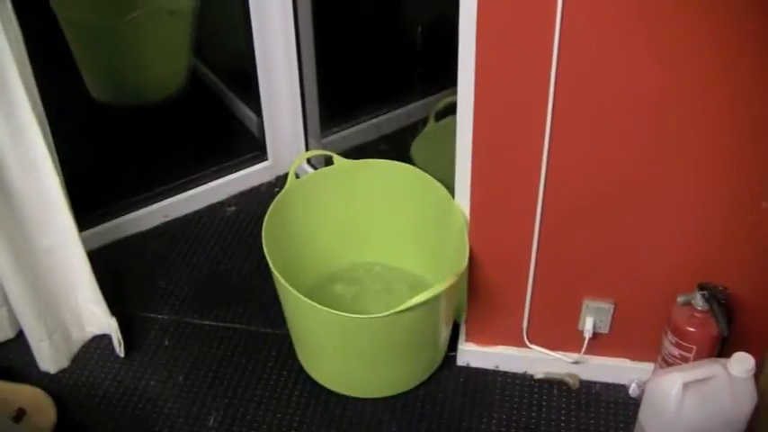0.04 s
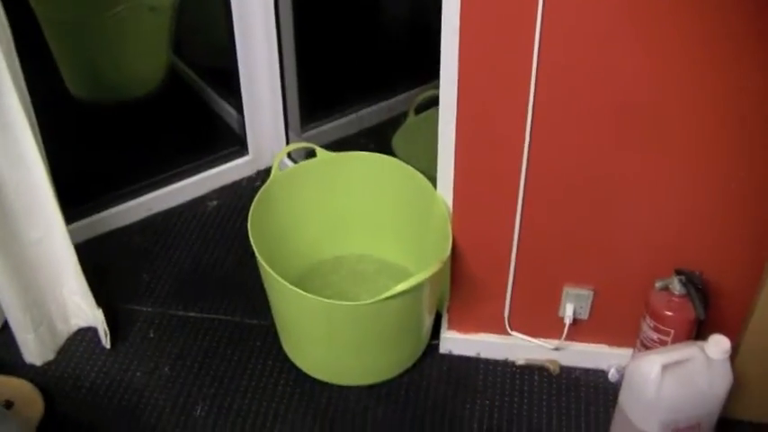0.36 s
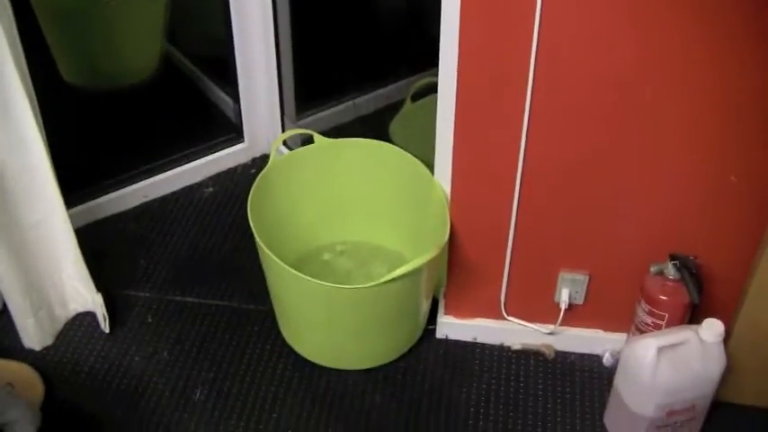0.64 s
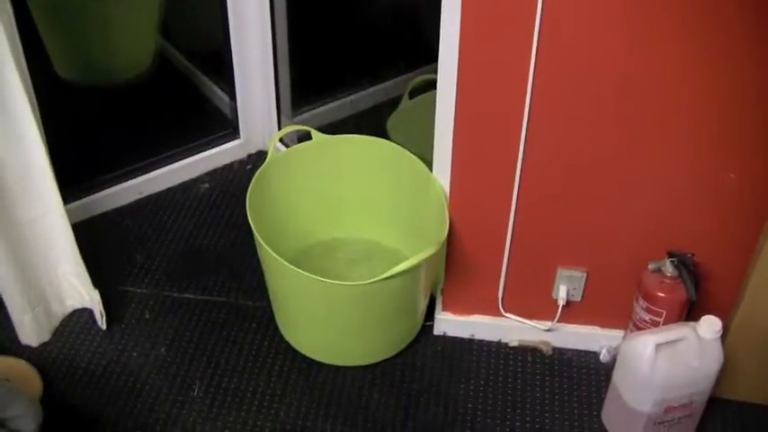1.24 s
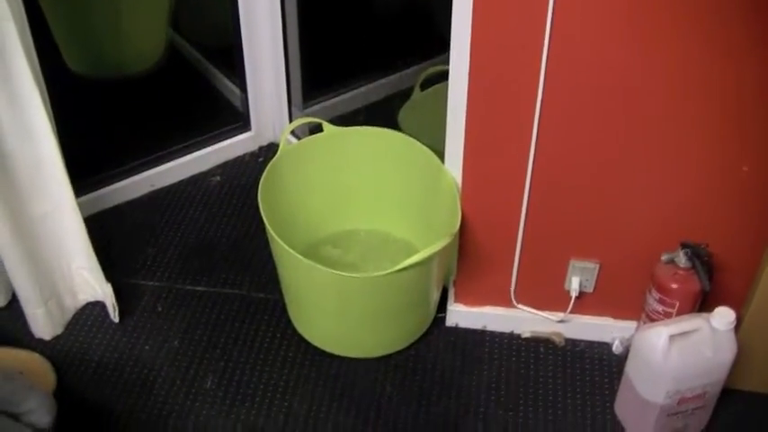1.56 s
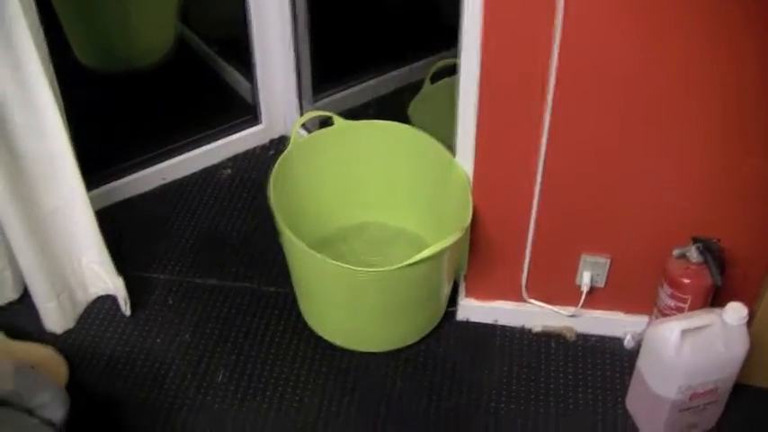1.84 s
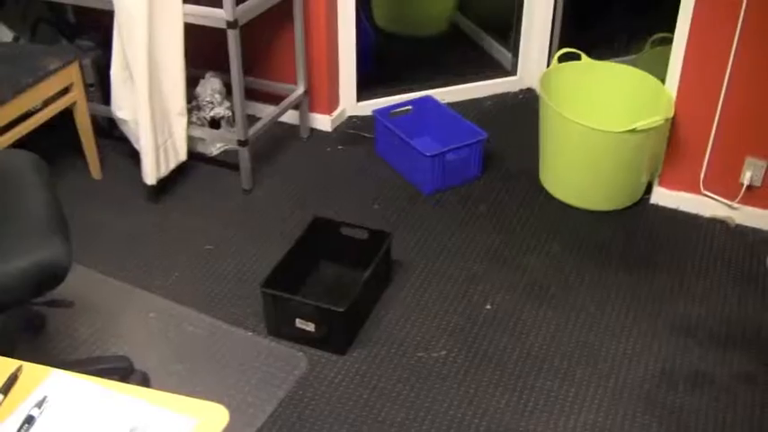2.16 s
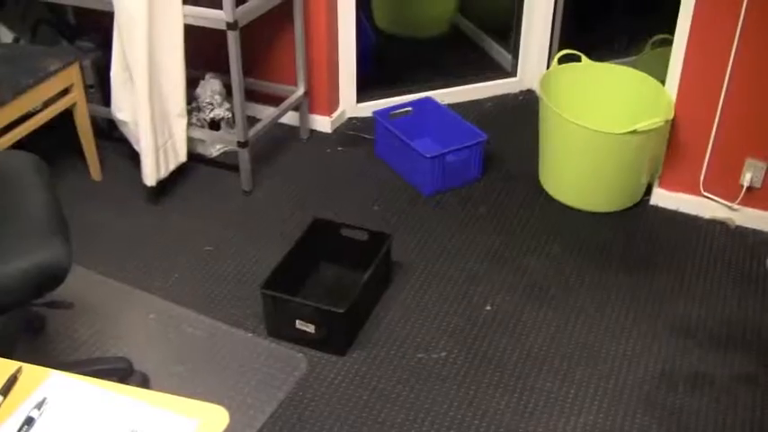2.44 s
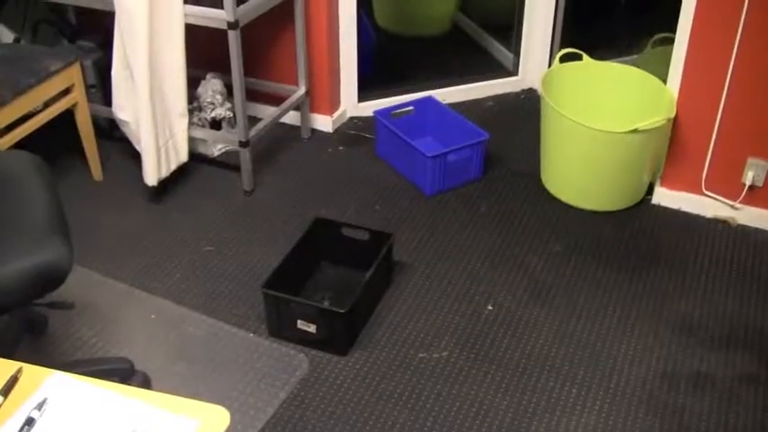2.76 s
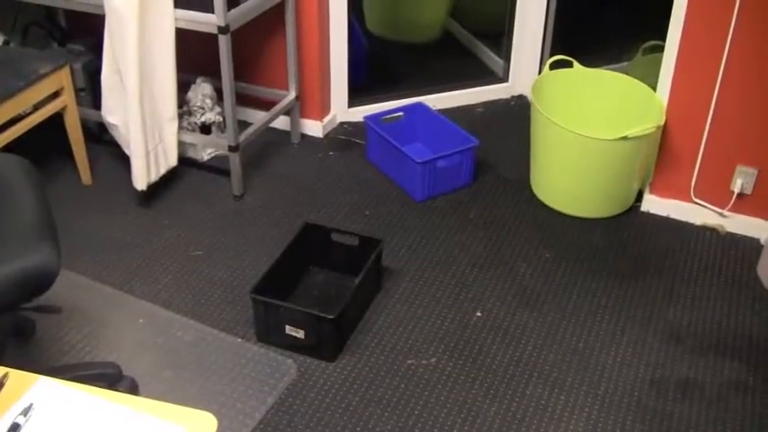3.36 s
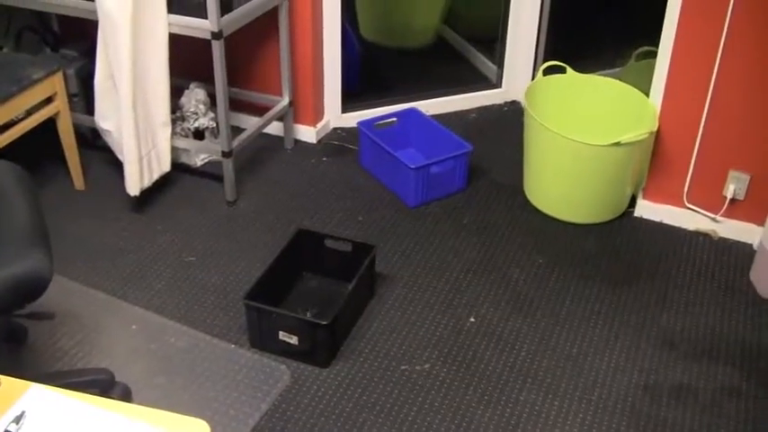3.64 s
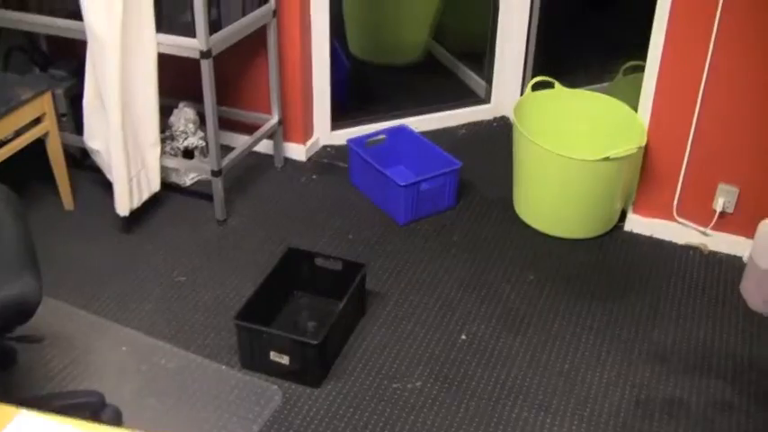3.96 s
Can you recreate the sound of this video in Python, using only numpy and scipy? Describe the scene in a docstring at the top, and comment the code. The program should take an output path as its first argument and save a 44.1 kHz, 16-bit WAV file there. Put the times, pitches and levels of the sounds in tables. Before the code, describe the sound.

A stream of water spatters into a plastic tub, giving way to irregular knocking drips.

```python
"""Ceiling leak into a plastic tub

Water pours from a leaking ceiling into a plastic tub: it spatters, traps bubbles and drums on the floor of the
tub. After two seconds the scene changes: the pour fades out and a scene of single drops fades in, knocking
unevenly on the tub and two plastic crates and throwing spray. All is heard from a few metres away in a small,
quiet room."""
import sys
import numpy as np
from scipy import signal
from scipy.fft import rfft, irfft
from scipy.io import wavfile
from scipy.ndimage import uniform_filter1d

SR = 44100
rng = np.random.default_rng(int(sys.argv[2]) if len(sys.argv) > 2 else 0)


def unload_audio(sound):
    """Save the sound as a 16-bit wav file, at the path given as the first command line argument."""
    columns = np.transpose(np.atleast_2d(sound))
    # keep every value between -1 and 1, then stretch to whole-number steps
    steps = np.round(np.clip(columns, -1, 1) * 32767)
    wavfile.write(sys.argv[1], SR, steps.astype(np.int16))


N = 176400
POUR_FADE_S, POUR_END_S, DRIPS_START_S, DRIPS_FULL_S = 1.985, 2.085, 2.033, 2.18


def undb(db):
    """Decibels to gain."""
    return 10 ** (np.asarray(db) / 20)


def unit(x):
    """Scale to rms 1."""
    return x / np.sqrt(np.mean(x ** 2) + 1e-20)


def clock(size=N):
    """Seconds, sample by sample."""
    return np.arange(size) / SR


def decay(t, t60):
    """A fall of 60 dB in t60 seconds."""
    return np.exp(-np.log(1000) * t / max(t60, 1e-3))


def attack(t, seconds):
    """A soft onset with the given time constant."""
    return 1 - np.exp(-t / seconds)


def add(out, start, sound):
    """Mix a sound in at its start time."""
    i = max(int(start * SR), 0)
    out[i:i + len(sound)] += sound[:max(len(out) - i, 0)]


def colour(x, points, size=2048):
    """Minimum-phase EQ that follows (Hz, dB) points."""
    hz, db = np.array(points, float).T
    gain = undb(np.interp(np.log(np.fft.rfftfreq(size, 1 / SR) + 1), np.log(hz), db))
    cepstrum = irfft(np.log(gain))
    cepstrum[1:size // 2] *= 2
    cepstrum[size // 2 + 1:] = 0
    return signal.fftconvolve(x, irfft(np.exp(rfft(cepstrum))))[:len(x)]


def burst(points, t60, size=8192):
    """Coloured noise that starts at rms 1 and dies away."""
    noise = rng.standard_normal(size)
    return colour(noise * decay(clock(size), t60), points) / np.std(colour(noise, points))


def glide(t, hz, rise):
    """A sine that passes through hz at t = 0, gliding by `rise` octaves per second."""
    pitch = np.minimum(hz * 2 ** (rise * t), SR / 2)
    return np.sin(2 * np.pi * np.cumsum(pitch) / SR)


def waver(depth_db, smooth_samples, size=N):
    """A gain that wanders at random, by depth_db rms."""
    drift = uniform_filter1d(rng.standard_normal(size), 1500)
    return undb(depth_db * unit(uniform_filter1d(drift, smooth_samples)))


def impacts(per_s, spread_db, size=N):
    """Random tiny hits, many weak and a few strong."""
    strength = undb(spread_db * np.minimum(rng.exponential(size=size), 4.3))
    return unit((rng.random(size) < per_s / SR) * strength * rng.choice([-1, 1], size))


def patter(per_s, spread_db, size=N):
    """Droplets in six sizes, per_s of each, ticking in their own octave and arriving in flurries."""
    out = np.zeros(size)
    for octave in range(6):
        band = signal.butter(1, [300 * 2 ** octave, 600 * 2 ** octave], "bandpass", fs=SR, output="sos")
        flurries = waver(depth_db=2, smooth_samples=800, size=size)
        out += signal.sosfilt(band, impacts(per_s, spread_db, size)) * flurries
    return out


def bubble(hz, t60, rise, attack_cycles=2.34, size=4096):
    """A trapped bubble rings and rises in pitch as it nears the surface."""
    t = clock(size)
    return glide(t, hz, rise) * decay(t, t60) * attack(t, attack_cycles / hz)


def fizz(level_db, low_hz, high_hz, cycles, spread_db, count=650):
    """A swarm of small bubbles, many weak and a few strong, each ringing for roughly `cycles` periods."""
    out = np.zeros(N)
    for when, pitch, chance, life in rng.random((count, 4)):
        hz = low_hz * (high_hz / low_hz) ** pitch
        strength = undb(-spread_db * np.log(max(chance, .02)))
        add(out, when * POUR_END_S, strength * bubble(hz, t60=(.5 + life) * cycles / hz, rise=8.5))
    return undb(level_db) * out / np.std(out[:int(POUR_END_S * SR)])


def swell(hz, peak_s, width_s, rise, size=4096):
    """A gliding note that swells to its peak and dies away."""
    t = clock(size) - peak_s
    return glide(t, hz, rise) * np.exp(-(t / max(width_s, 1e-3)) ** 2)


def splash(hz, t60):
    """A short splat of torn water, brightest around one frequency."""
    skirt = 2 ** 0.67  # two thirds of an octave
    spectrum = [(hz / 30, -50), (hz / 10, -30), (hz / skirt, -9), (hz, 0), (hz * skirt, -9),
                (hz * 10, -40)]
    return burst(spectrum, t60)


def pour():
    """The stream spatters on the water, drums on the tub floor and drags bubbles under."""
    # EQ of the bright spatter and the low drumming. Each row: frequency in Hz, gain in dB.
    spatter_eq = [(400, 0.5), (1000, 5.5), (2000, 5), (3500, 4.5), (5000, 4.5), (7500, 3), (10000, 0),
                  (13000, -4.5), (16000, -11)]
    drumming_eq = [(30, -58), (60, -14.5), (100, -10.5), (160, 2.5), (205, 2), (320, 6.5), (450, 1),
                   (600, 0.5), (1000, -9.5), (2500, -23)]
    # Bubbles that stand out. Each row: peak time in seconds, pitch in Hz, level in dB,
    # half width in seconds, glide in octaves per second.
    big_bubbles = [(0.029, 2650, -25, 0.004, -2), (0.216, 1816, -28.5, 0.0045, 9),
                   (0.254, 1230, -30.5, 0.0097, 0), (0.256, 1986, -34.5, 0.017, 7.5),
                   (0.32, 836, -35, 0.009, 12), (0.34, 1185, -38, 0.012, 7), (0.513, 1020, -41.5, 0.018, 1),
                   (0.556, 1110, -34, 0.0051, 12), (0.562, 1460, -38, 0.0097, -2),
                   (0.654, 965, -32, 0.0067, 0), (0.662, 564, -30, 0.004, 15),
                   (0.728, 832.6, -31, 0.0092, 6), (0.757, 2100, -32, 0.006, 6.5),
                   (0.821, 1390, -40.5, 0.013, 2), (0.939, 2552, -35, 0.012, 9.5),
                   (1.011, 1032, -41, 0.0096, 4.5), (1.056, 1185, -41.5, 0.019, 1.5),
                   (1.166, 1139, -40.5, 0.01, 9.5), (1.224, 1148, -45, 0.012, 3),
                   (1.238, 3960, -34, 0.011, 9.5), (1.275, 1240, -35, 0.0053, 3),
                   (1.354, 800, -36, 0.0049, 2), (1.37, 1160, -36, 0.013, 6),
                   (1.418, 3618, -27.5, 0.004, 14), (1.427, 1211, -24.5, 0.0092, -0.5),
                   (1.507, 1110, -36, 0.0093, 12.5), (1.536, 1970, -33, 0.0036, 13),
                   (1.58, 935, -41, 0.015, 2), (1.638, 2280, -34.5, 0.0037, 0),
                   (1.708, 1072, -35, 0.004, -2), (1.772, 457.4, -31.5, 0.021, 6),
                   (1.786, 1128, -23, 0.0035, 12), (1.87, 2060, -29.5, 0.0034, 13),
                   (1.892, 1094, -33.5, 0.006, -2.5), (1.953, 1235, -29.5, 0.006, 15),
                   (1.98, 746, -26, 0.009, 5.5), (1.975, 1143, -30, 0.006, 5),
                   (1.994, 2100, -26.5, 0.004, 2), (2.002, 1085, -28, 0.00408, -5),
                   (2.01, 1260, -24.5, 0.004, 14)]
    # Splash accents. Each row: start in seconds, level in dB, brightest frequency in Hz, t60 in seconds.
    big_splashes = [(0.024, -22, 3030, 0.15), (.197, -28, 334, .06), (.204, -29, 7400, 0.054),
                    (.44, -30.5, 238, 0.076), (0.869, -35, 9140, 0.024), (1.3894, -41, 6560, .02),
                    (1.956, -30, 7800, 0.029), (0.051, -25, 5440, 0.071), (.154, -27.5, 5500, 0.034),
                    (.258, -27.5, 1930, 0.042), (0.375, -25, 4570, 0.031), (0.4974, -21.5, 5940, 0.023),
                    (0.502, -29, 6000, 0.15), (.657, -26, 3600, 0.03), (.66, -31, 400, 0.16),
                    (0.8953, -32, 8000, 0.031), (0.927, -28.5, 2670, 0.074), (1.229, -29, 4240, 0.1),
                    (1.105, -29.5, 3600, 0.086), (1.415, -22, 2950, 0.055), (1.447, -25.5, 6080, 0.015),
                    (1.62, -30.5, 3570, 0.04), (1.782, -26, 676, 0.11), (1.784, -28, 3240, 0.11),
                    (1.831, -27.5, 7780, 0.062), (1.872, -24, 3570, 0.18), (1.902, -31, 312, 0.13)]
    flow = waver(depth_db=1.54, smooth_samples=1000)
    spatter = undb(-37.5) * unit(colour(patter(per_s=1700, spread_db=2.5), spatter_eq))
    drumming = undb(-41.5) * unit(colour(impacts(per_s=260, spread_db=1.5), drumming_eq))
    gurgle = fizz(level_db=-41, low_hz=886.5, high_hz=5940, cycles=24, spread_db=3.5)
    ticks = fizz(level_db=-46, low_hz=5000, high_hz=14000, cycles=28, spread_db=4.5)
    out = flow * spatter + gurgle + ticks + drumming
    for peak, hz, db, width, rise in big_bubbles:
        add(out, peak - 2 * width, undb(db + 3.5) * swell(hz, 2 * width, width, rise))
        add(out, peak - width, undb(db - 9) * splash(hz, t60=0.084))  # the splash that traps the bubble
    for start, db, hz, t60 in big_splashes:
        add(out, start, undb(db + 1) * splash(hz, t60))
    return out


def reverb_tail(t):
    """The room's diffuse ring; the treble hangs on a little longer."""
    noise = rng.standard_normal(len(t))
    low = signal.sosfilt(signal.butter(1, 2500, fs=SR, output="sos"), noise)
    ring = (low * decay(t, t60=0.38) + (noise - low) * decay(t, t60=0.51)) * attack(t, 0.0059)
    return ring / np.linalg.norm(ring)


def room(x, tail_db, side_db, size=32768):
    """Direct sound, dull first reflections and a diffuse tail; the treble is wide, the bass central."""
    # First reflections. Each row: delay in seconds, level in dB.
    reflections = [(.0052, -26), (.0087, -17), (0.0127, -13.5), (0.0191, -14), (0.048, -23), (0.052, -14)]
    # EQ of the left-right difference. Each row: frequency in Hz, gain in dB.
    side_eq = [(60, -15), (300, -11.5), (1200, -13.5), (2500, -11), (4500, -6.5), (8000, -2.5),
               (11000, 2.5), (16000, 5)]
    t, early = clock(size), np.zeros(size)
    for lag, db in reflections:
        add(early, lag, undb([db]))
    mid = signal.sosfilt(signal.butter(1, 3080, fs=SR, output="sos"), early)
    mid += undb(tail_db) * reverb_tail(t)
    mid[0] += 1  # direct sound
    nearby = rng.standard_normal(size) * decay(t, t60=0.0064)
    side = undb(side_db) * colour(nearby / np.linalg.norm(nearby) + 0.63 * reverb_tail(t), side_eq)
    mid, side = (signal.fftconvolve(x, response)[:N] for response in (mid, side))
    return np.array([mid + side, mid - side])


def room_tone():
    """Faint steady air of the room, partly shared by left and right."""
    # A dark noise bed. Each row: frequency in Hz, gain in dB.
    air_eq = [(25, -12), (60, -21.5), (130, -5), (300, 2.5), (1000, -6.5), (3000, -15.5), (8000, -22),
              (16000, -28)]
    shared = rng.standard_normal(N)
    channels = [unit(colour(shared + 0.96 * rng.standard_normal(N), air_eq)) for _ in range(2)]
    return undb(-47.5) * np.array(channels)


def knock(t, modes, shell_eq, ring_db, shell_db, shell_t60):
    """A drop strikes plastic: the modes ring, slightly detuned each hit, and the flexing shell rattles."""
    ring = np.zeros(len(t))
    for k, (hz, db, t60) in enumerate(modes):
        detuned_hz = hz * (1 + 0.016 * rng.standard_normal())
        ring += (-1) ** k * undb(db) * np.sin(2 * np.pi * detuned_hz * t) * decay(t, t60)
    rattle = burst(shell_eq, shell_t60, len(t))
    return undb(ring_db) * ring * attack(t, 0.0042) + undb(shell_db) * rattle


def spray(t):
    """A drop shatters into a quick shower of fine droplets."""
    # EQ of the shower. Each row: frequency in Hz, gain in dB.
    spray_eq = [(600, -12), (1500, 8), (2600, 2.5), (4500, -2.5), (7500, -7.5), (11000, -16.5),
                (16000, -22)]
    shower = unit(colour(patter(per_s=1100, spread_db=5.5, size=len(t)), spray_eq))
    return undb(-37) * shower * decay(t, t60=0.34) * attack(t, 0.0028)


def drips(drops, modes, shell_eq, notes=(), **knock_settings):
    """Each drop smacks the wet floor, knocks, throws spray and stirs any hollow notes by where it lands."""
    out, t = np.zeros(N), clock(16384)
    for start, knock_db, spray_db, smack_db, smack_hz, *notes_db in drops:
        add(out, start, undb(spray_db) * spray(t))
        add(out, start, undb(knock_db) * knock(t, modes, shell_eq, **knock_settings))
        add(out, start, undb(smack_db) * splash(smack_hz, t60=0.038))
        for note_db, note in zip(notes_db, notes):
            add(out, start, undb(note_db) * swell(*note))
    return out


def far_crate():
    """Drops knock on the far crate, whose shell rattles on after each hit."""
    # Each row: start in seconds, gains of knock, spray and smack in dB, smack frequency in Hz.
    drops = [(2.098, -3.5, -6, -48, 1000), (2.128, -2, -11, -55, 1000), (2.324, -2, -4.5, -41, 1000),
             (2.577, 0, -18, -23, 1000), (2.833, -3.5, -12, -33, 920), (3.0895, -1, -7, -37, 1000),
             (3.498, -1, -5, -21, 806), (3.602, -3, -26, -48, 990), (3.846, -4, -25, -33, 900)]
    # The crate's ring. Each row: pitch in Hz, level in dB, t60 in seconds.
    modes = [(238, -9, 0.16), (312.7, -3.5, 0.29), (422.6, 2.5, 0.13), (496.6, 8, 0.16), (696, -3, 0.058),
             (848.4, 4.5, 0.11), (1210, -32, .08), (1190, -2, 0.038)]
    # Dense flexing of the plastic. Each row: frequency in Hz, gain in dB.
    shell_eq = [(30, -73), (100, -33), (260, -3), (500, 3), (680, 4.5), (1050, 5.5), (1500, -3.5),
                (2400, -11), (4000, -26.5), (16000, -56)]
    return drips(drops, modes, shell_eq, ring_db=-33, shell_db=-30.5, shell_t60=0.34)


def stray_droplets():
    """Flung droplets land with a tiny splat and, for the lower ones, a plink."""
    # Each row: start in seconds, level in dB, brightest frequency in Hz, t60 in seconds.
    landings = [(2.202, -47.5, 9090, 0.066), (2.269, -47.5, 4210, 0.073), (2.413, -38, 11600, 0.079),
                (2.475, -45, 1950, .05), (2.696, -47.5, 11900, 0.27), (2.708, -42, 2410, 0.11),
                (2.778, -43, 7740, 0.053), (3.053, -42.5, 7600, 0.15), (3.054, -39.5, 2610, 0.037),
                (2.968, -45.5, 9470, 0.12), (3.112, -43.5, 4830, 0.12), (3.403, -39.5, 8050, 0.075),
                (3.437, -33, 2380, 0.07), (3.715, -44.5, 2060, 0.15), (3.764, -47.5, 6735, 0.2),
                (3.852, -48.5, 4540, 0.059)]
    out = np.zeros(N)
    for start, db, hz, t60 in landings:
        add(out, start, undb(db) * splash(hz, t60))
        if hz < 6000:  # fine mist traps no bubble
            add(out, start, undb(db + 1) * bubble(hz, t60, rise=4.2))
    return out


def near_crate():
    """Drops hit the wet near crate with a tight knock and two hollow notes."""
    # Each row: start in seconds, gains of knock, spray and smack in dB, smack frequency in Hz,
    # then each hollow note's level in dB.
    drops = [(2.391, -1.5, -3, -33, 3380, -28, -33), (2.551, -3, -4, -20, 1239, -47, -31),
             (2.93, 2, -0.5, -34, 3000, -31, -27), (3.391, 1.5, -0.5, -37, 1500, -47, -46),
             (3.473, -1.5, 0.5, -36.5, 3800, -31, -26), (3.524, -6, -13, -23, 705, -40, -30)]
    # The crate's ring. Each row: pitch in Hz, level in dB, t60 in seconds.
    modes = [(328, -13, 0.11), (451, -4.5, 0.043), (750, -11, 0.082), (919, -6.5, 0.17), (1088, -2.5, 0.09),
             (1303, 3, 0.037), (1440, -17, 0.078)]
    # Dense flexing of the plastic. Each row: frequency in Hz, gain in dB.
    shell_eq = [(30, -44), (100, -42), (280, -3.5), (550, 0.5), (1000, 5.5), (1600, -4.5), (2500, -7.5),
                (4500, -17.5), (8000, -40), (16000, -54)]
    # Hollow notes. Each row: pitch in Hz, peak time and half width in seconds, rise in octaves per second.
    notes = [(321, 0.016, 0.017, 0.19), (418, 0.015, 0.006, 1.8)]
    return drips(drops, modes, shell_eq, notes, ring_db=-25, shell_db=-25.5, shell_t60=0.13)


def tub():
    """Drops hit the tub with a deeper knock and three hollow, rising notes."""
    # Each row: start in seconds, gains of knock, spray and smack in dB, smack frequency in Hz,
    # then each hollow note's level in dB.
    drops = [(2.413, -9.5, -1, -37, 2470, -37.5, -35, -25),
             (2.651, -10, -3, -36, 2000, -38.5, -25.5, -29.5),
             (2.861, -6.5, -6, -41, 1590, -36, -40, -27.5), (3.305, -7.5, -4, -27.5, 1486, -39, -39, -22.5),
             (3.346, -3, -1.5, -31, 1360, -38, -26.5, -39), (3.749, -8, -5.5, -31, 1310, -37, -40.5, -24)]
    # The tub's ring. Each row: pitch in Hz, level in dB, t60 in seconds.
    modes = [(262, -12, 0.17), (365.4, -0.5, 0.1306), (411, -7, 0.071), (460, -7, 0.036), (793, -3, 0.16),
             (1110, -4, 0.16), (1520, -8, 0.072), (1755, -7.5, 0.14)]
    # Dense flexing of the plastic. Each row: frequency in Hz, gain in dB.
    shell_eq = [(30, -42), (100, -49), (260, -1.5), (450, 2.5), (600, -0.5), (1200, -6), (2000, -10.5),
                (3500, -21.5), (8000, -34), (16000, -53)]
    # Hollow notes. Each row: pitch in Hz, peak time and half width in seconds, rise in octaves per second.
    notes = [(164.5, 0.016, 0.016, 3.1), (289, 0.012, 0.0057, 3.8), (447, 0.0099, 0.0074, 19.6)]
    return drips(drops, modes, shell_eq, notes, ring_db=-22, shell_db=-20, shell_t60=0.12)


def scene():
    """The scene changes: the pour fades out as the dripping and the room tone fade in."""
    tub_drips = tub()
    crate_drips = far_crate() + near_crate()
    pouring = room(pour(), tail_db=-9.5, side_db=-0.5)
    dripping = room(tub_drips, tail_db=-3, side_db=0)
    dripping += room(crate_drips + stray_droplets(), tail_db=-4.5, side_db=0.5)
    fade_out = np.interp(clock(), [POUR_FADE_S, POUR_END_S], [1, 0])
    fade_in = np.interp(clock(), [DRIPS_START_S, DRIPS_FULL_S], [0, 1])
    return pouring * fade_out + (dripping + room_tone()) * fade_in


def record(dry):
    """The right channel is slightly louder; the top is cut steeply."""
    balance_db, top_hz = 0.8, 16100
    high_cut = signal.ellip(10, .1, 80, top_hz, fs=SR, output="sos")
    return signal.sosfilt(high_cut, dry * undb([[-balance_db / 2], [balance_db / 2]]))


dry = scene()
out = record(dry)
unload_audio(out)
```